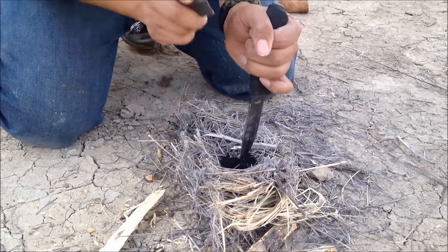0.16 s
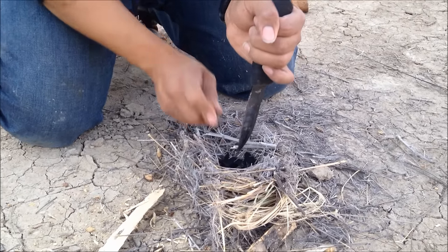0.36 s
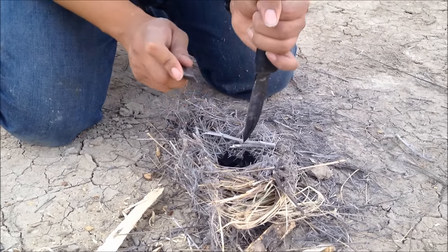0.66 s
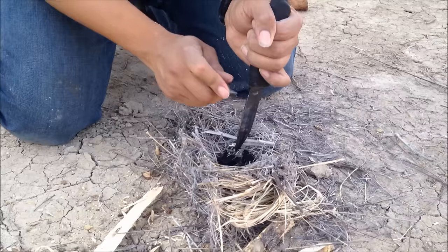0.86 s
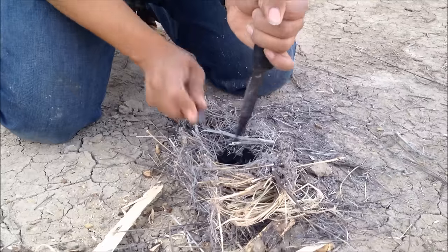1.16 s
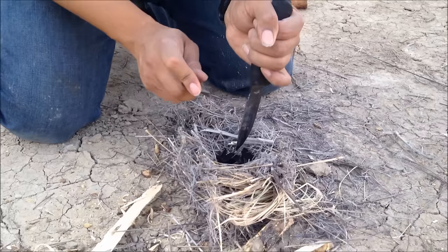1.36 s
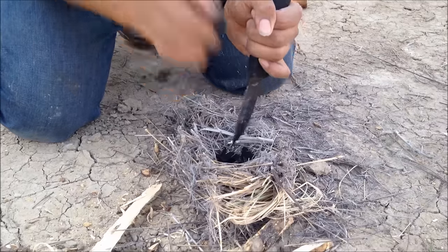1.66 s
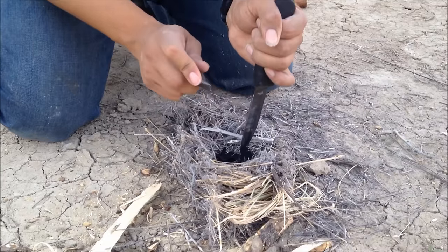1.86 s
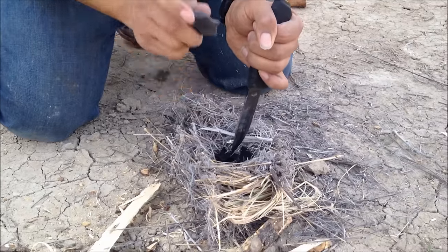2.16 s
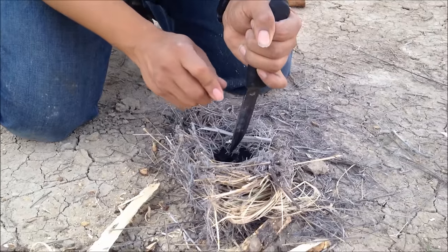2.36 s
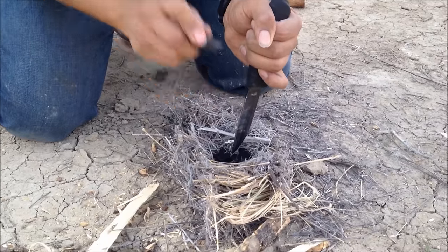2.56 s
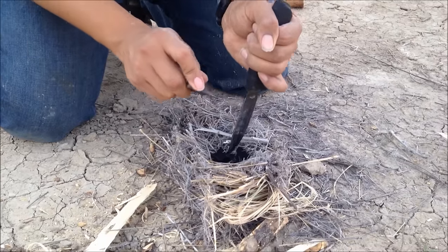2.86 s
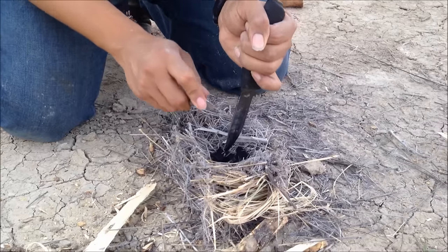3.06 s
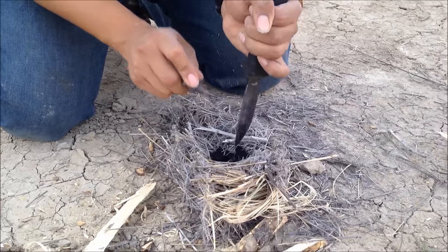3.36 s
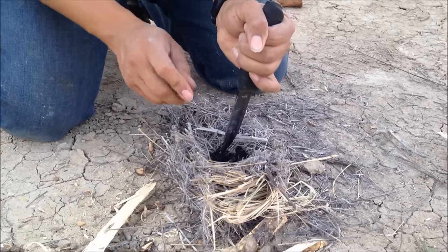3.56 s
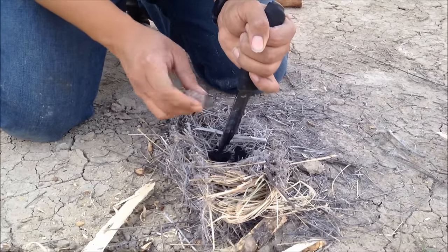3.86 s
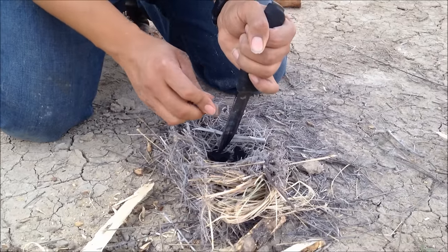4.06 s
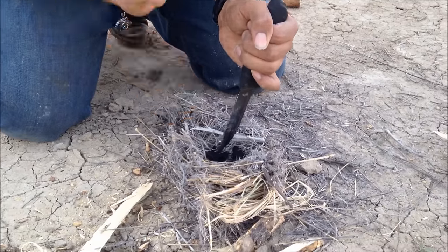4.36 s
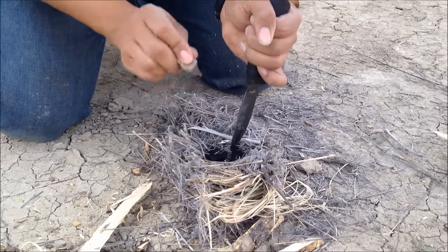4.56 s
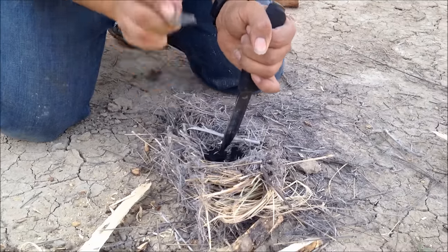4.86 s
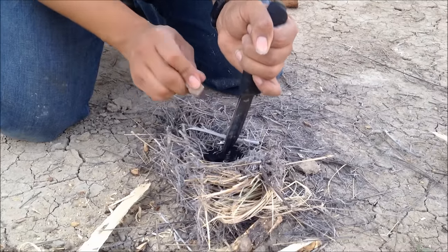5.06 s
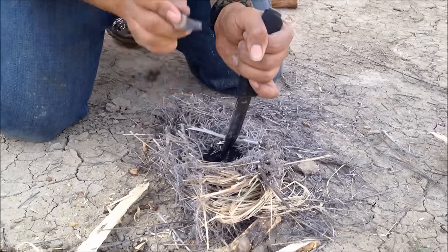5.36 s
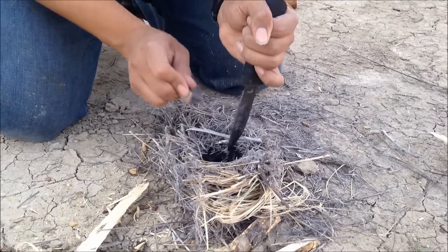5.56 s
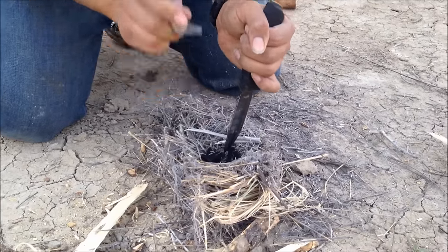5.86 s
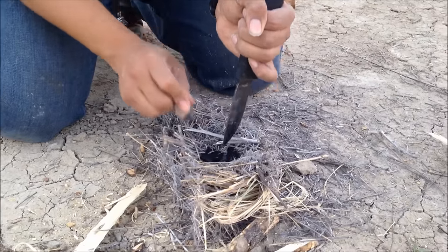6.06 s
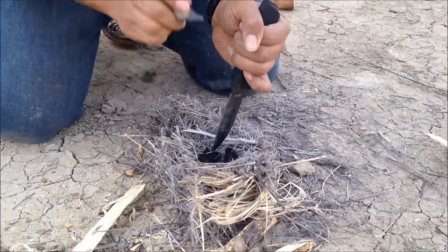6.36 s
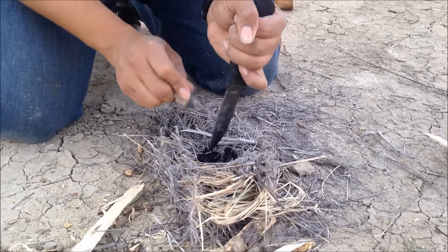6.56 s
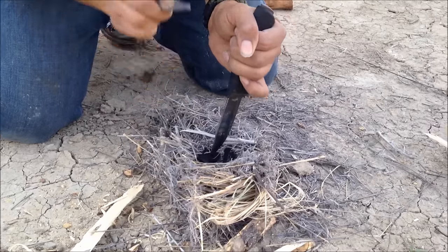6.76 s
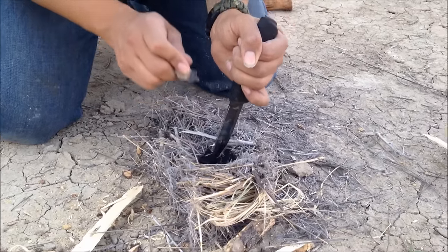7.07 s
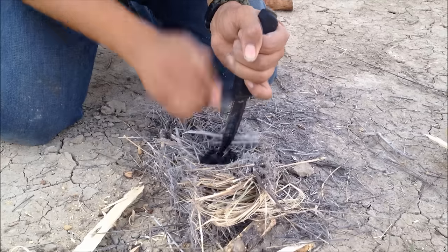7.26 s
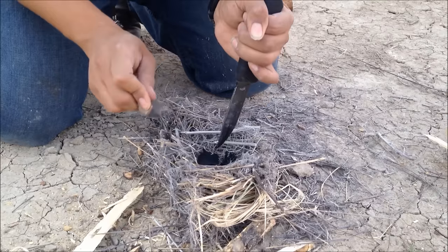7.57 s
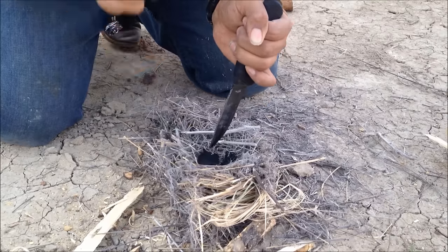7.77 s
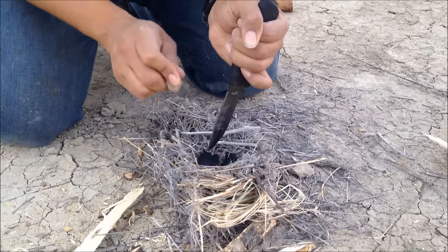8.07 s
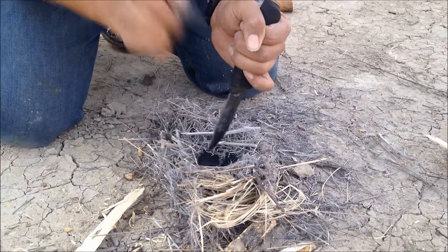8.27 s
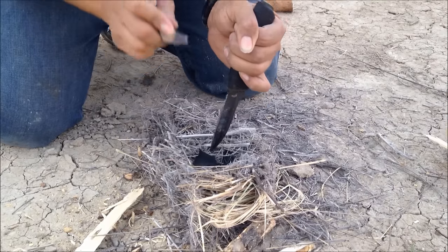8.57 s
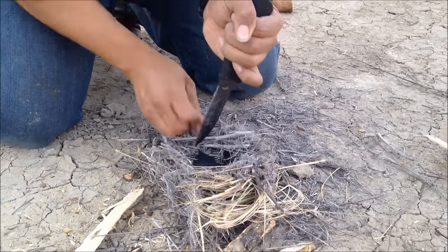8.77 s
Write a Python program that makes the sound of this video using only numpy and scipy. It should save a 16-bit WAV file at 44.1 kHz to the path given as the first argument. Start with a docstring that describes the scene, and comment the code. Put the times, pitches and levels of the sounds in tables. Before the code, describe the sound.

Flint strikes the spine of a steel knife close to the microphone, outdoors. Each blow is a sharp, bright click with a tiny scrape and a very short, hand-damped metallic ring; some catch twice. Strikes land at about 0.1, 0.5, 1.3, 1.9, 2.9 and 3.5 seconds, then come more steadily at 4.6, 5.1, 5.7, 6.2, 6.7 and 7.1. A weaker, scratchier glancing blow follows at 7.5, and two firm ones at 8.1 and 8.5. Soft, dull thuds in the dry tinder accompany the blows at 5.7 and 7.5. Hands and dry grass rustle very faintly now and then, most noticeably around 8.5. A distant bird gives one thin, faint, rising whistle at about 1.5 seconds. Throughout, far engines make a quiet low drone and rumble under the hush of open air, well below the strikes.

```python
"""Sharp clicks of flint struck down the spine of a steel knife, which stands in a tinder nest on dry ground.
Each blow rings the hand-damped blade for a moment, then the stone's edge scrapes and catches on the steel.
A few jolts thud into the nest. Hands and dry grass rustle faintly, a bird whistles once,
and far engines drone underneath in the hush of open air."""
import sys
import numpy as np
from scipy import signal
from scipy.fft import rfft, irfft, next_fast_len
from scipy.io import wavfile
from scipy.ndimage import uniform_filter1d, map_coordinates

SR = 44100
rng = np.random.default_rng(int(sys.argv[2]) if len(sys.argv) > 2 else 0)


def output_pcm(signal):
    """Save a mono or channel-first signal as 16-bit PCM at the path in sys.argv[1].

    Samples are clipped to [-1, 1] before scaling.
    """
    pcm = np.clip(np.atleast_2d(signal).T, -1, 1) * 32767
    wavfile.write(sys.argv[1], SR, np.round(pcm).astype(np.int16))


N = 393813
TIME_S = np.arange(N) / SR

# flint on steel: start_s, blow_energy_db, scrape_s, scrape_db, body_db, snap_db, treble_db
STRIKES = [ (0.0709, 4, 0.0076, -30, -8, -0.5, -2.5), (0.5198, 5, 0.0087, -26, -2, -4, 0.5),
           (1.3111, 5.5, 0.007, -29.5, -3, 2, 4), (1.8902, 5.5, 0.0089, -27, -2, .5, 4),
           (2.862, 5.5, .023, -31, 2, -1, 2), (3.4733, 4.5, 0.014, -25.5, 4, -1, 1.5),
           (4.6284, 6.5, .013, -29.5, -1, .5, 2.5), (5.1424, 3.5, 0.011, -23, 6, 0, 6.5),
           (5.6797, 2, .002, -22.5, -3.5, -8.5, 1), (6.185, 6, 0.014, -29, 1, 2, 6),
           (6.6714, 5, .004, -23, 0.5, -2.5, -5), (7.0675, 3, 0.0027, -22, -1, 3.5, 0.5),
           (7.4596, -26, 0.039, -57, 7, 1.5, 17.5), (8.056, 5, 0.01, -27.5, 0.5, 0, 2.5),
           (8.4995, 5.5, 0.0076, -31.5, -3.5, 0.5, -3), ]
# the stone bites again or rebounds: start_s, energy_db
CATCHES = [(0.5211, 4), (.5295, 3.5), (1.3205, -7), (2.876, -6), (3.478, -0.5), (4.6509, -3), (5.667, -33),
           (6.215, -23), (7.4695, -15.5), (7.4784, -11.5), (7.486, -26), (8.067, -1.5), (8.522, -15.5)]

def flint(size=4096, firm_db=3.5, knock_per_db=0.78, snag_db=20, ground_db=-28.5, ground_delay_s=.004):
    """Each strike drives the blade with a blow, a scrape ending in a snag, and any nearby catches."""
    out = np.zeros(N)
    t, hz = np.arange(size) / SR, np.fft.rfftfreq(size, 1 / SR)
    for start_s, blow_db, scrape_s, scrape_db, *colour_db in STRIKES:
        knock_db = knock_per_db * (firm_db - blow_db)  # weaker blows are duller
        knife = blade(hz, knock_db, *colour_db)
        strike = amp(blow_db) * blow(t, hz, knife) + amp(scrape_db) * scrape(t, hz, knife, scrape_s)
        add(out, start_s, strike)
        add(out, start_s + scrape_s, amp(scrape_db + snag_db) * blow(t, hz, knife))
        scatter = amp(ground_db) * np.linalg.norm(strike) * ground_scatter()
        add(out, start_s + ground_delay_s + scrape_s / 2, scatter)
        for catch_s, catch_db in CATCHES:
            if abs(catch_s - start_s) < t[-1]:
                add(out, catch_s, amp(catch_db) * blow(t, hz, knife))
    return out


def blow(t, hz, knife, grit=0.29, crumble_s=.0011, contact_hz=8500):
    """One contact: a sharp push, then the stone's edge crumbles briefly."""
    force = grit * rng.standard_normal(len(t)) * np.exp(-t / crumble_s)
    force[0] += 1
    return struck(force, knife / (1 + 1j * hz / contact_hz))


def scrape(t, hz, knife, length_s, spread_db=7.0, rise_s=0.0014, highpass_hz=3500):
    """The edge shaves the steel in a dense run of tiny slips, then leaves the spine."""
    slips = rng.standard_normal(len(t)) * amp(spread_db * rng.standard_normal(len(t)))
    progress = t / length_s
    pressure = (1 - np.exp(-t / rise_s)) * np.exp(-0.26 * progress) / (1 + progress ** 14)
    highpass = 1j * hz / (highpass_hz + 1j * hz)
    return struck(slips * pressure, knife * highpass) * np.sqrt(length_s * SR)


def struck(force, knife):
    """The knife's answer to a force, at energy 1."""
    push = rfft(force)
    # countless tiny fractures excite all pitches alike: flatten the force's spectrum
    smooth_power = uniform_filter1d(np.abs(push) ** 2, size=61)
    flat_push = push / minimum_phase(10 * np.log10(np.abs(smooth_power) + 1e-12))
    fade = np.minimum(1, np.linspace(2, 0, len(force))) ** 4
    sound = irfft(flat_push * knife) * fade
    return sound / np.linalg.norm(sound)


# modes of the gripped blade: pitch_hz, width_hz, gain_db
BLADE_MODES = [(1808, 150, 8), (2530, 210, 10), (3146, 220, 9.5), (3910, 440, 3.5), (4795, 430, 12),
               (5470, 260, 9.5), (6035, 450, 5.5)]
# bare click of stone on steel: freq_hz, gain_db
CLICK_SPECTRUM = [(60, -19), (250, -15.5), (600, -12.5), (1000, -7.5), (2000, -3), (3200, 4.5), (5000, 6),
                  (7500, 4.5), (10000, -3), (15000, -2)]

def blade(hz, knock_db, body_db, snap_db, treble_db, vary_db=1, detune=0.0078, travel_s=.0004):
    """Response of the knife; each strike lands elsewhere on the spine and weighs the modes anew."""
    colour = [(900, knock_db), (1500, body_db), (2500, body_db), (3800, 0), (5000, 0),
              (5800, snap_db), (7000, snap_db), (10000, treble_db)]
    ring = 1
    for pitch_hz, width_hz, gain_db in BLADE_MODES:
        pitch_hz = pitch_hz * (1 + detune * rng.normal())
        damping = 1j * hz * width_hz
        resonance = damping / (pitch_hz ** 2 - hz ** 2 + damping)
        ring = ring + amp(gain_db + vary_db * rng.normal()) * resonance
    # low bending waves run slower through steel; travel_s is the delay at 5 kHz
    dispersion = np.exp(-4j * np.pi * travel_s * np.sqrt(5000 * hz))
    return ring * dispersion * minimum_phase(along(CLICK_SPECTRUM, hz) + along(colour, hz))


# decay of scatter from ground and scrub: freq_hz, t60_s
GROUND_DECAY = [(300, .12), (3500, .26), (7000, .22), (15000, .15)]
# colour of the scatter: freq_hz, gain_db
SCATTER_SPECTRUM = [(300, -14), (1500, -10), (3200, 1.5), (6000, 0.5), (9000, -5), (15000, -9)]

def ground_scatter(near_db=8, near_t60_s=0.08, rise_s=0.0048):
    """Unpitched reflections at energy 1: brief from knees and nest, longer from ground and scrub."""
    hz, t, bands = signal.stft(rng.standard_normal(SR // 2), SR, nperseg=128)
    near = amp(near_db - 60 * t / near_t60_s)
    far = amp(-60 * t / along(GROUND_DECAY, hz)[:, None])
    envelope = (near + far) * (1 - np.exp(-t / rise_s))
    colour = amp(along(SCATTER_SPECTRUM, hz))[:, None]
    tail = signal.istft(bands * colour * envelope, SR)[1]
    return tail / np.linalg.norm(tail)


# hand and knife jolt the nest: start_s, level_db
THUDS = [(1.983, -60), (4.629, -55), (5.667, -38.5), (5.679, -54), (7.464, -37.5)]
# colour of the nest: freq_hz, gain_db
NEST_SPECTRUM = [(80, -12.5), (200, -6.5), (450, -5.5), (900, -13.5), (3000, -23), (12000, -67.5)]

def thuds(t60_s=0.039, rise_s=0.00063):
    """Soft, low bumps that tinder and dirt damp at once."""
    envelope, t = np.zeros(N), np.arange(SR // 10) / SR
    for start_s, level_db in THUDS:
        add(envelope, start_s, amp(level_db - 60 * t / t60_s) * (1 - np.exp(-t / rise_s)))
    return envelope * noise(NEST_SPECTRUM)


# hand, sleeve and dry grass: peak_s, sigma_s, level_db, bright_db
RUSTLES = [(0.688, 0.033, -72, -8.5), (0.772, 0.041, -66.5, -9), (3.87, .013, -67.5, 11),
           (4.095, .018, -70, 8), (4.2, .022, -76.5, 6), (5.209, .018, -63.5, 2), (5.545, 0.02, -72, 3.5),
           (7.267, 0.033, -71.5, 0.5), (8.532, 0.016, -53, 5.5), (8.92, 0.02, -65, -13)]
# colour of dry friction: freq_hz, gain_db
STRAW_SPECTRUM = [(300, 4.5), (1500, -13.5), (3200, -5), (7500, -6), (15000, -14)]

def rustles(scuff_db=-87.5, swing_db=4, grain_db=2):
    """Short swells of grainy friction over the faint scuffing of shifting hands."""
    swells = sum(amp(level_db) * bump(peak_s, sigma_s) * noise(STRAW_SPECTRUM, bright_db)
                 for peak_s, sigma_s, level_db, bright_db in RUSTLES)
    scuffs = amp(scuff_db + swing_db * wobble(2.9)) * noise(STRAW_SPECTRUM, bright_db=-14)
    return (swells + scuffs) * amp(grain_db * wobble(400))


def bird(start_s=1.38, length_s=.335, pitch_hz=4080, rise_hz_per_s=880, end_db=-71.5, swell_db_per_s=62):
    """One thin whistle that rises and swells steadily, then stops."""
    age_s = np.clip(TIME_S - start_s, 0, length_s)
    level_db = end_db - swell_db_per_s * (length_s - age_s)
    whistle = tone(pitch_hz + rise_hz_per_s * age_s, level_db, waver_db=-1.0, waver_hz=33)
    return whistle * gate(start_s, start_s + length_s, fade_s=.015)


# nearest of the far engines: time_s, level_db
ENGINE_LEVELS = [(0, -57), (.45, -48), (1.3, -49), (2.1, -58.5), (3.4, -49.5), (4.8, -55.5), (5.9, -48),
                 (6.4, -60.5), (8.93, -60)]
# other engines: start_s, end_s, pitch_hz, drift_hz_per_s, level_db
DRONES = [(-0.5, 2.7, 85.5, -.8, -53.5), (3.5, 11, 75, 0, -57.5), (0, 8.5, 91, 0, -61.5),
          (-0.5, 7.7, 113, -0.079, -63), (0, 6.8, 122.5, .85, -64)]

def engines(rev_hz=76.93, idle_hz=65.3, settle_s=.33):
    """Low firing tones: one engine settles to idle, the others hold or drift slowly in pitch."""
    firing_hz = idle_hz + (rev_hz - idle_hz) * np.exp(-(TIME_S / settle_s) ** 2)
    engine_db = np.interp(TIME_S, *np.transpose(ENGINE_LEVELS))
    out = tone(firing_hz, engine_db, waver_db=0.42, waver_hz=3.3)
    for start_s, end_s, pitch_hz, drift_hz_per_s, level_db in DRONES:
        hum = tone(pitch_hz + drift_hz_per_s * (TIME_S - start_s), level_db, waver_db=2, waver_hz=3.6)
        out += gate(start_s, end_s, fade_s=0.46) * hum
    return out


# far rumble: freq_hz, gain_db
RUMBLE_SPECTRUM = [(20, -23), (30, -16), (40, -6), (52, -1), (70, 0), (115, -5), (150, -11), (190, -13),
                   (270, -17), (400, -24), (800, -42), (3000, -120)]
# open air: freq_hz, gain_db
AIR_SPECTRUM = [(100, -9.5), (400, -2), (700, -2.5), (1100, -4.5), (2000, -12.5), (2900, -16.5),
                (4200, -18), (7000, -20.5), (11000, -23), (15000, -23.5)]
# the background dips briefly: centre_s, sigma_s, depth_db
LULLS = [(6.36, .11, 6), (8.671, .09, 3)]

def background(rumble_db=-58, rise_db_per_s=0.53, air_db=-71.5, air_lull_share=0.7):
    """Far engines over a slowly growing rumble, and the hush of open air."""
    lull_db = sum(depth_db * bump(centre_s, sigma_s) for centre_s, sigma_s, depth_db in LULLS)
    rumble = amp(rumble_db + rise_db_per_s * TIME_S) * noise(RUMBLE_SPECTRUM)
    air = amp(air_db - air_lull_share * lull_db + .7 * wobble(9.2)) * noise(AIR_SPECTRUM)
    return amp(-lull_db) * (engines() + rumble) + air


def tone(hz, level_db, waver_db, waver_hz):
    """A gliding sine whose level wavers on its way through the air."""
    envelope = np.sqrt(2) * amp(level_db + waver_db * wobble(waver_hz))
    return envelope * np.sin(2 * np.pi * (np.cumsum(hz) / SR + rng.random()))


def noise(spectrum, bright_db=0):
    """Coloured noise of rms 1; bright_db tilts 10 kHz against 2 kHz."""
    tilt = [(2000, 0), (10000, bright_db)]
    x = filtered(rng.standard_normal(N), lambda hz: amp(along(spectrum, hz) + along(tilt, hz)))
    return x / np.sqrt(np.mean(x ** 2) + 1e-20)


def filtered(x, response):
    size = next_fast_len(N + 8192)
    return irfft(rfft(x, size) * response(np.fft.rfftfreq(size, 1 / SR)), size)[:N]


def minimum_phase(gain_db):
    """Causal response with this gain: nothing sounds before the contact."""
    cepstrum = irfft(np.log(amp(gain_db)))
    half = len(cepstrum) // 2
    cepstrum[1:half] *= 2
    cepstrum[half + 1:] = 0
    return np.exp(rfft(cepstrum))


def along(points, hz):
    """Interpolate (freq_hz, value) points on a log axis."""
    freq_hz, values = np.transpose(points)
    return np.interp(np.log(hz + 1), np.log(freq_hz + 1), values)


def wobble(rate_hz):
    """Smooth random curve, rate_hz knots a second."""
    return map_coordinates(rng.standard_normal(int(N * rate_hz / SR) + 4), [TIME_S * rate_hz])


def bump(centre_s, sigma_s):
    return np.exp(-((TIME_S - centre_s) / sigma_s) ** 2 / 2)


def gate(start_s, end_s, fade_s):
    """1 from start to end, fading to 0 outside."""
    return np.clip(1 + np.minimum(TIME_S - start_s, end_s - TIME_S) / fade_s, 0, 1)


def amp(db):
    return 10 ** (np.asarray(db) / 20)


def add(track, start_s, sound):
    part = track[round(start_s * SR):][:len(sound)]
    part += sound[:len(part)]


def scene():
    """The strikes close by, everything else faint behind them; mono."""
    return (flint() + thuds() + rustles() + bird() + background())[None]


def record(dry, top_hz=15450, ceiling=.52):
    """Round off the sharpest peaks between two steep low-passes."""
    lowpass = lambda hz: 1 / np.sqrt(1 + (hz / top_hz) ** 200)
    heard = filtered(dry[0], lowpass)
    rounded = heard / (1 + (heard / ceiling) ** 6) ** (1 / 6)
    return filtered(rounded, lowpass)[None]


dry = scene()
out = record(dry)
output_pcm(out)
```